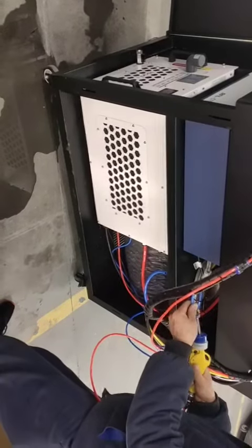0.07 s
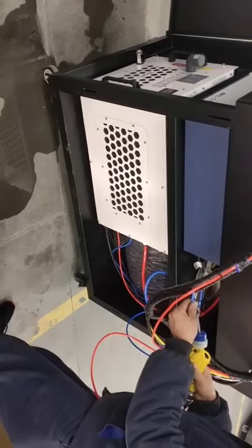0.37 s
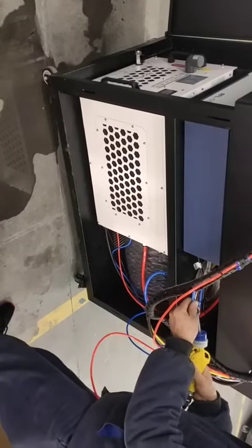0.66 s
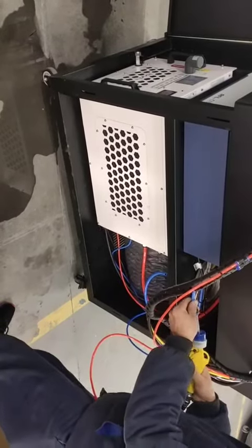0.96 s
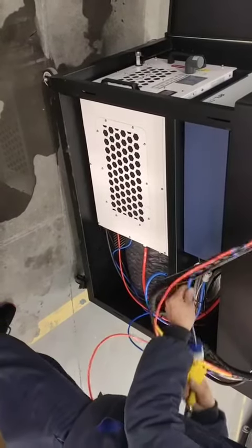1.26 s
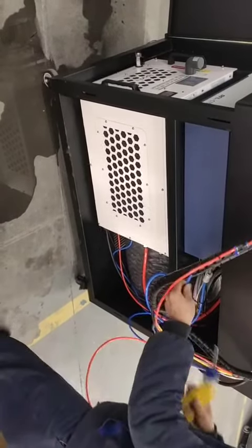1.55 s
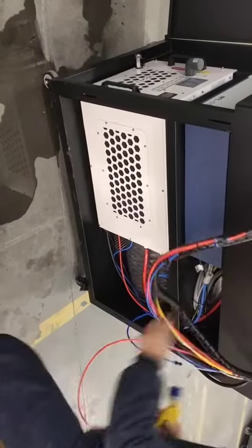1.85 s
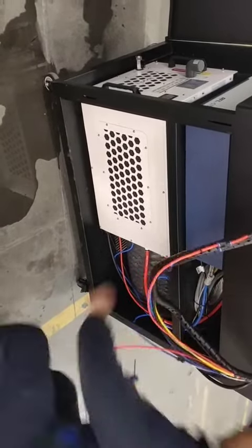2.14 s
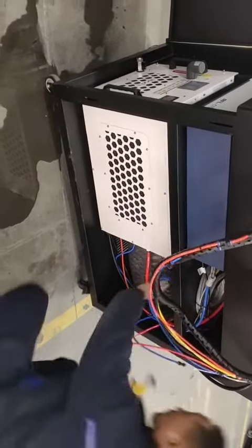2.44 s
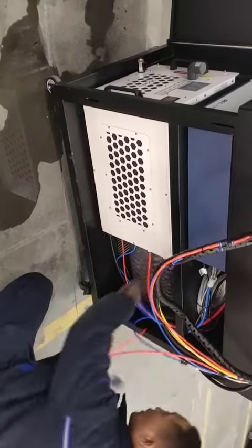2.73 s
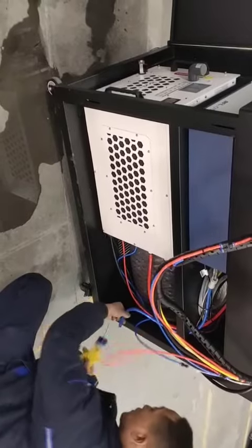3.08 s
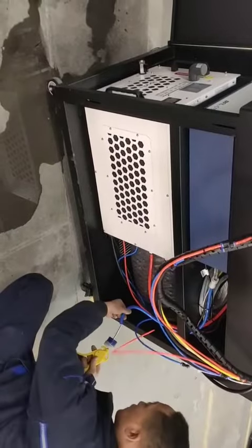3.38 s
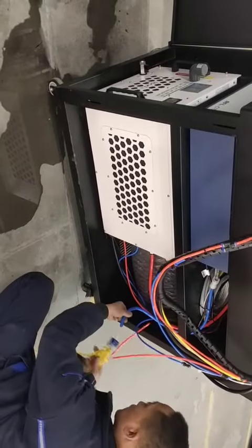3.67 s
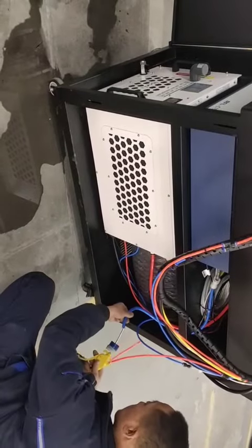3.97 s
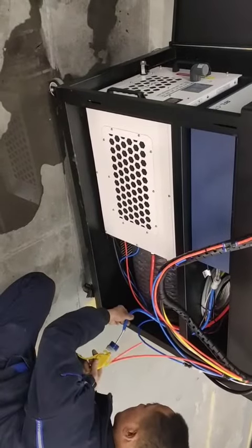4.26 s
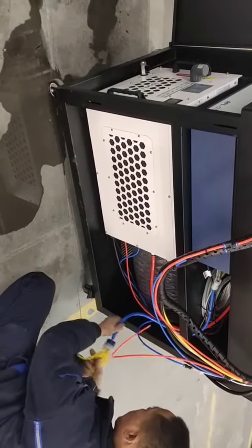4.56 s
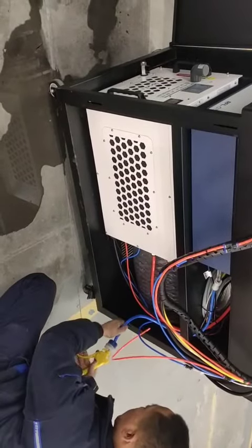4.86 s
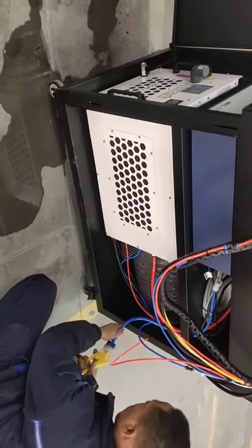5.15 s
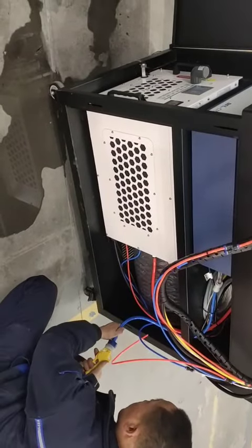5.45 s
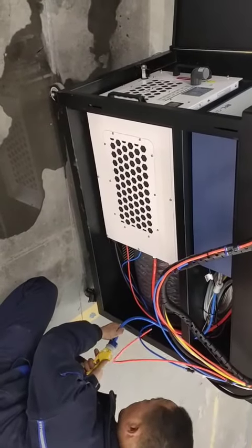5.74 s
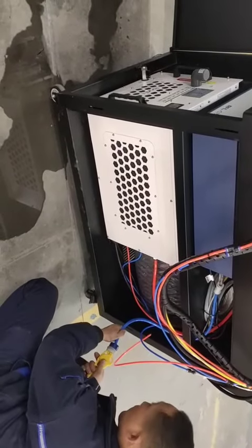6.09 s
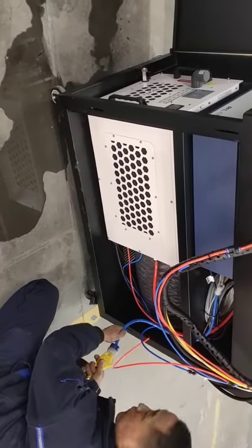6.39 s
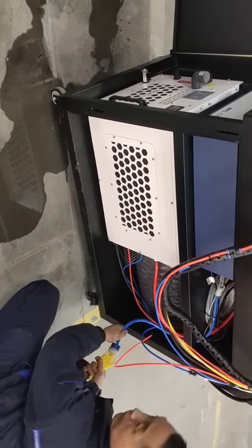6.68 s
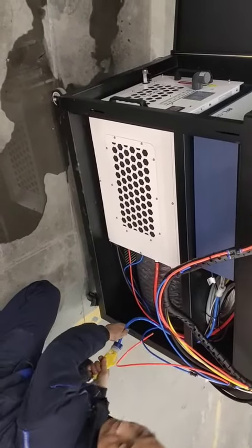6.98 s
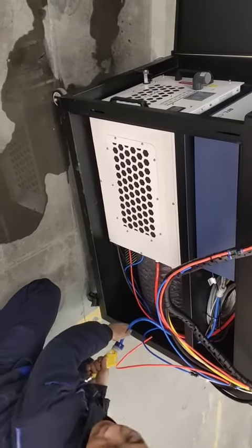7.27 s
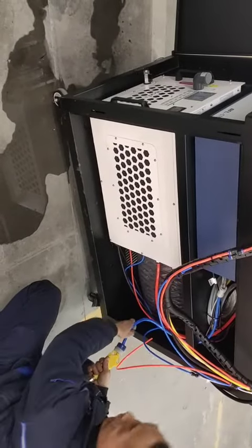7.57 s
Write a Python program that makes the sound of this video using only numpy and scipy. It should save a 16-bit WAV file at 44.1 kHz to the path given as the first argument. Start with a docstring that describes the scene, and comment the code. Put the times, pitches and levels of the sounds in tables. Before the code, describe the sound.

Heard from close above in a workshop, a pump gives a piercing, uneven squeal and a many-toned whine over a loud rushing hiss and a steady compressor hum. Air spurts briefly from a fitting, and hoses are handled with faint bumps. Midway the pump's pitch rises a little and the squeal breaks off, then comes back and weakens, leaving mostly hiss and hum.

```python
"""In a workshop, an open cooling cabinet runs while a worker handles its hoses; a phone listens from above.
The compressor hums with its turning shaft, the worker makes a few soft bumps and air spurts from a fitting.
Liquid and air hiss loudly through a pump: its bearing sings, its rubbing rotor whines and its seal squeals
once a turn. Near four seconds the pump sheds its load and speeds up; the squeal stops, returns and fades."""
import sys
import numpy as np
from scipy import signal
from scipy.fft import rfft, irfft, next_fast_len
from scipy.io import wavfile
from scipy.ndimage import uniform_filter1d, map_coordinates

SR = 44100
rng = np.random.default_rng(int(sys.argv[2]) if len(sys.argv) > 2 else 0)


def dump(signal):
    """Clip the signal to [-1, 1] and save it as 16-bit WAV at the path in sys.argv[1]."""
    limited = np.clip(np.atleast_2d(signal).T, -1, 1)
    pcm = np.round(limited * 32767).astype(np.int16)
    wavfile.write(sys.argv[1], SR, pcm)


N = 340452

# how loud the compressor's steady hum comes through at the phone (time [s], level [dB])
HUM_PICKUP = [(0, -48), (.4, -44.5), (1.25, -44.5), (1.275, -57), (1.4, -45), (1.6, -44), (1.9, -40.5),
              (7.7, -40.5)]
# the tones in that hum (multiple of the shaft speed, relative level [dB])
HUM_TONES = [(1, -29), (2, -0.5), (3, -16), (4, -1), (5, -11.5), (6, -11), (7, -6), (8, -7.5), (9, -17.5),
             (10, -13.5), (11, -15.5), (12, -11.5), (13, -12.5), (14, -12), (15, -18), (16, -14), (17, -16),
             (18, -12.5), (19, -10.5), (20, -13), (21, -6), (22, -13), (23, -11.5)]
# low air noise of the cabinet (frequency [Hz], relative level [dB])
RUMBLE_SPECTRUM = [(20, -13.5), (55, -17.5), (90, -1), (150, -2), (250, -0.5), (400, 3.5), (700, 1.5),
                   (1500, -21.5)]
# the worker's soft bumps (time [s], level [dB], pitch [Hz], half length [s])
WORKER_BUMPS = [(0.058, -40, 172, .06), (0.148, -46, 282, 0.093), (2.143, -38, 264, 0.041),
                (2.277, -39.5, 245, 0.042), (2.37, -43, 280, 0.055), (3.145, -48, 270, 0.11)]
# a fine jet of air, which spurts as the tool leaves the fitting (time [s], level [dB])
JET_LEVELS = [(0, -33.5), (1.2, -32), (1.3, -26.5), (1.38, -37), (1.48, -60.5), (7.7, -69)]
# the noise of that jet, and the narrow note of a hose (frequency [Hz], relative level [dB])
JET_SPECTRUM = [(3900, -20), (4150, 1), (4400, -0.5), (4700, -5), (5000, 0.5), (5700, -5), (6100, -21.5)]
HOSE_NOTE_SPECTRUM = [(2880, -24.5), (2980, -5.5), (3030, 1), (3100, -6), (3200, -26)]

# low, middle and high parts of the flow (frequency [Hz], relative level [dB])
GURGLE_SPECTRUM = [(300, -27), (450, -17.5), (750, -10), (1050, -0.5), (1400, 1), (1800, 0.5), (2300, 1.5),
                   (3000, -17.5)]
HISS_SPECTRUM = [(1300, -34), (1800, -8.5), (2150, -0.5), (2400, -3.5), (2650, -4.5), (3000, -2),
                 (3400, -3), (3800, -1), (4400, -3), (5300, -3.5), (5700, -8.5), (6300, -32)]
SPRAY_SPECTRUM = [(4800, -24), (5800, -2), (6300, -1.5), (6900, -3.5), (7500, -3), (7800, -8),
                  (8100, -15.5), (8500, -33)]
# how loud the gurgle is (time [s], relative level [dB])
GURGLE_LEVELS = [(0.04, -41), (0.51, -41.5), (1.35, -41.5), (1.8, -38.5), (7.4, -38), (7.66, -37)]
# how loud the rest of the flow is (time [s], relative hiss level [dB], relative spray level [dB])
FLOW_LEVELS = [(0.04, -29, -33), (0.14, -31.5, -32), (0.31, -29, -32), (1.31, -31, -33.5),
               (1.38, -28.5, -36.5), (1.76, -29.5, -34), (1.82, -26.5, -34.5), (1.88, -28, -35),
               (3.75, -27.5, -33.5), (3.88, -28, -40), (4.3, -29.5, -41), (4.94, -26.5, -31),
               (5.32, -25.5, -34), (5.39, -27, -33), (6.68, -27, -37), (7.11, -26.5, -36),
               (7.43, -27, -39.5), (7.66, -28, -38.5)]
# a brief dip in the hiss (start [s], end [s], depth [dB])
HISS_DIP = (1.2, 1.32, 2.7)
# pitches at which the hoses ring (frequency [Hz], half width [Hz], boost [dB])
HOSE_RESONANCES = [(3060, 85, 6), (3620, 60, 2.5), (6480, 120, 2.5), (7550, 110, 2.5)]

# the pump sags and labours under load (time [s], speed [turns/s])
LOADED_SPEED = [(0, 155.2), (.5, 153.9), (1.15, 152.5), (1.85, 149.75), (2.7, 150), (3.25, 149.45),
                (3.8, 150.3)]
# the bearing's tone, then its octave (level under load [dB], boost once unloaded [dB], growth [dB/s])
BEARING_TONES = [(-51, 7.5, 0.76), (-52.5, 4.5, 0.66)]
# the bearing sings out (start [s], end [s], tone change [dB], octave change [dB])
BEARING_SURGES = [(1.4, 1.72, 8.5, 2), (1.72, 2.35, -1, 9.5), (2.6, 3.6, -3, 6.5), (3.78, 3.97, 6, 4)]
# the tones of the rubbing rotor (multiple of the pump speed, relative level [dB])
WHINE_TONES = [(10, -50), (11, -45.5), (18, -44), (19, -44), (21, -37), (22, -43.5), (24, -39), (25, -38),
               (26, -45.5), (27, -39.5), (28, -43.5), (31, -44.5), (32, -39.5), (33, -42), (36, -47.5),
               (37, -44.5), (40, -43.5)]
# the rotor's loudest whistles (start [s], end [s], multiple of the pump speed, relative level [dB])
LOUD_WHISTLES = [(0.0, 0.85, 9, -45), (0.02, 0.8, 38, -43), (1.6, 3.0, 10, -41.5), (1.7, 2.45, 51, -44.5),
                 (1.85, 2.5, 39, -42), (2.15, 2.35, 32, -36), (2.4, 3.45, 45, -45), (2.58, 2.95, 51, -42),
                 (2.94, 3.32, 32, -33), (2.95, 3.45, 24, -36.5), (3.0, 3.3, 27, -36.5),
                 (3.05, 3.33, 39, -36), (3.5, 3.75, 10, -41), (3.6, 3.73, 21, -33), (5.1, 5.17, 24, -30),
                 (5.2, 5.9, 39, -45)]
# its faint whistles (lowest multiple of the pump speed, highest multiple)
STRAY_RANGE = (41, 50)
# the rasp around the squeal (frequency [Hz], relative level [dB])
RASP_SPECTRUM = [(1700, -30.5), (2000, -3), (2130, 1), (2260, 5), (2420, -8.5), (2700, -28.5)]
# what the pump's housing lets through of the squeal (frequency [Hz], relative level [dB])
HOUSING_RESPONSE = [(1750, -21), (1860, -5.5), (1950, -16), (1985, -1), (2300, -1.5), (2400, -4.5),
                    (2460, 3), (2550, -1.5), (2680, -23)]
# the seal's squeals
# (start [s], end [s], level [dB], fade [dB/s], resonance [Hz], half width [Hz], phase slip [rad])
SEAL_SQUEALS = [(0.02, 0.43, -28, 8, 2060, 220, .3), (0.447, 0.664, -31, 7, 2190, 230, .35),
                (0.67, 0.823, -25.5, 7, 2130, 190, .25), (0.815, 1.253, -29.5, 12, 2260, 170, 0.23),
                (1.464, 1.74, -22, 7, 2220, 115, 0.28), (1.755, 1.817, -19.5, 6, 2160, 115, 0.18),
                (1.87, 2.686, -22, 6.5, 2172, 115, .2), (2.673, 2.97, -23.5, -5, 2164, 115, .15),
                (2.973, 3.484, -19, 3.5, 2240, 95, .07), (3.495, 3.886, -25.5, 6, 2136, 115, 0.33),
                (3.716, 3.762, -17, 8, 2170, 110, .1), (4.91, 5.14, -22, 16, 2165, 130, 1.1),
                (5.17, 5.78, -29, 8, 2160, 130, 0.54), (5.95, 7.3, -36, 1.5, 2170, 160, 1.1)]

UNLOAD_S = 3.84  # when the pump sheds its load


def amp(db):
    """Turn decibels into a gain to multiply by."""
    return 10 ** (np.asarray(db) / 20)


def unit(x):
    """Scale x to an average (rms) level of 1."""
    return x / np.sqrt(np.mean(x ** 2) + 1e-20)


def curves(rows):
    """Join a table's points with straight lines: one curve for each column after the time."""
    times, *columns = np.transpose(rows)
    return [np.interp(np.arange(N) / SR, times, column) for column in columns]


def gate(start, end, attack, release):
    """Rise, hold and fall; the ramps are centred on start and end, all in seconds."""
    t = np.arange(N) / SR
    return np.clip(.5 + np.minimum((t - start) / attack, (end - t) / release), 0, 1)


def since(start):
    """Seconds gone by since start, 0 before it."""
    return np.maximum(np.arange(N) / SR - start, 0)


def wobble(rate):
    """A smooth curve through `rate` random values a second."""
    coarse = np.arange(0, N + 64, 64)
    knots = rng.standard_normal(int(N * rate / SR) + 4)
    return np.interp(np.arange(N), coarse, map_coordinates(knots, [coarse * rate / SR], mode="nearest"))


def tone(phase):
    """A sine wave of rms level 1 that starts anywhere in its cycle."""
    return np.sqrt(2) * np.sin(phase + rng.uniform(0, 2 * np.pi))


def filtered(x, response):
    """Scale each frequency in x by response(frequency)."""
    size = next_fast_len(N + 8192)
    return irfft(rfft(x, size) * response(np.fft.rfftfreq(size, 1 / SR)), size)[:N]


def rush(spectrum, patchy_db):
    """Rushing noise of rms level 1, shaped by a spectrum, with random louder and softer patches."""
    cells = signal.stft(rng.standard_normal(N), nperseg=512)[2]
    patches = uniform_filter1d(rng.standard_normal(cells.shape), size=5, axis=0)  # smooth over pitch
    patches = uniform_filter1d(patches, size=12, axis=1)  # and over time
    noise = signal.istft(cells * amp(patchy_db * unit(patches)), nperseg=512)[1][:N]
    hz, db = np.transpose(spectrum)
    colour = lambda f: amp(np.interp(np.log(f + 1), np.log(hz), db, left=-120, right=-120))
    return unit(filtered(noise, colour))


def compressor(shaft_hz=46.37, rumble_db=-8, waver_db=.6, drift_rad=.037):
    """The shaft hums steadily at multiples of its speed, over low air noise."""
    pickup_db, = curves(HUM_PICKUP)  # the phone's pickup ducks briefly, then comes back louder
    angle = 2 * np.pi * shaft_hz * np.arange(N) / SR + drift_rad * wobble(2.04)
    hum = sum(amp(level + waver_db * wobble(6.9)) * tone(k * angle) for k, level in HUM_TONES)
    air = rush(RUMBLE_SPECTRUM, patchy_db=.8)
    return amp(pickup_db) * (hum + amp(rumble_db) * air)


def worker_bumps(spread=.2):
    """Each bump is a short swell of dull noise."""
    t, out = np.arange(N) / SR, np.zeros(N)
    for when, db, hz, half_length in WORKER_BUMPS:
        band = lambda f: 1 / (1 + (np.log((f + 1) / hz) / spread) ** 2)
        thud = unit(filtered(rng.standard_normal(N), band))
        out += amp(db) * thud * np.exp(-((t - when) / half_length) ** 2)
    return out


def air_jet():
    """Air escapes at the fitting until the hand lets go of it."""
    db, = curves(JET_LEVELS)
    return amp(db) * rush(JET_SPECTRUM, patchy_db=2)


def hose_note(full_db=-37, build_s=4.2):
    """Once the pump runs free, the flow slowly builds up a breathy note in one hose."""
    build = 1 - np.exp(-since(UNLOAD_S) / build_s)
    return build * amp(full_db + wobble(7)) * rush(HOSE_NOTE_SPECTRUM, patchy_db=3)


def flow(angle, gurgle_gain_db=5, hiss_gain_db=2, spray_gain_db=-1, throb=.049):
    """Liquid and air rush through the pump and ring in the hoses, throbbing a little with each turn."""
    gurgle_db, = curves(GURGLE_LEVELS)
    hiss_db, spray_db = curves(FLOW_LEVELS)
    start, end, dip_db = HISS_DIP
    hiss_db -= dip_db * gate(start, end, .02, .08)
    gurgle = amp(gurgle_db + gurgle_gain_db) * rush(GURGLE_SPECTRUM, patchy_db=1)
    hiss = amp(hiss_db + hiss_gain_db + .14 * wobble(23)) * rush(HISS_SPECTRUM, patchy_db=.6)
    spray = amp(spray_db + spray_gain_db) * rush(SPRAY_SPECTRUM, patchy_db=1.7)
    hoses = lambda f: amp(sum(db / (1 + ((f - hz) / width) ** 2) for hz, width, db in HOSE_RESONANCES))
    return filtered(gurgle + hiss + spray, hoses) * (1 + throb * np.cos(angle))


def unloaded(settle_s=.26):
    """How much of its load the pump has shed, from 0 to 1."""
    return 1 - np.exp(-since(UNLOAD_S) / settle_s)


def pump_speed(jump_hz=11.2, creep_hz_per_s=.89):
    """Turns per second: slow under load, quickly faster once it is shed, then creeping up."""
    loaded, = curves(LOADED_SPEED)
    return loaded + jump_hz * unloaded() + creep_hz_per_s * since(UNLOAD_S)


def bearing(angle, passes_per_turn=3.56, flutter_db=2.5, slip_rad=.59):
    """Balls roll past one spot on their track, making a tone and its octave, which is rough under load."""
    tone_db, octave_db = [loaded + boost * unloaded() + growth * since(UNLOAD_S)
                          for loaded, boost, growth in BEARING_TONES]
    for start, end, tone_change, octave_change in BEARING_SURGES:
        swell = gate(start, end, .1, .17)
        tone_db += tone_change * swell
        octave_db += octave_change * swell
    phase = passes_per_turn * angle
    octave = tone(2 * phase + slip_rad * (1 - unloaded()) * wobble(70))
    return amp(tone_db + wobble(9.2)) * tone(phase) + amp(octave_db + flutter_db * wobble(7.3)) * octave


def rubbing_db(base_db=-2, db_per_spray_db=1.2, relief_db=12, loose_db=8):
    """The rotor rubs harder with more spray and when dragged to its slowest, and less once unloaded."""
    _, spray_db = curves(FLOW_LEVELS)
    loaded, = curves(LOADED_SPEED)
    looseness = (loaded - loaded.min()) / np.ptp(loaded)
    extra_db = db_per_spray_db * (spray_db - spray_db.mean())
    return base_db + extra_db - relief_db * unloaded() - loose_db * looseness


def stray_whistles(angle, gain_db=-43):
    """Faint high whistles come and go at random while the rotor rubs."""
    lowest, highest = STRAY_RANGE
    whistles = np.zeros(N)
    for k in range(lowest, highest + 1):
        presence = np.clip(.4 + wobble(3), 0, 1)
        whistles += presence * tone(k * angle + .1 * wobble(9.8))
    return amp(rubbing_db() + gain_db) * whistles


def rotor_whine(angle, waver_db=3.5, whistle_gain_db=1):
    """The rubbing rotor makes many high, wavering tones; now and then one locks in and whistles."""
    rub = amp(rubbing_db())
    gains = {k: rub * amp(db + waver_db * wobble(6)) for k, db in WHINE_TONES}
    for start, end, k, db in LOUD_WHISTLES:
        whistle = gate(start, end, .05, .05) * amp(db + whistle_gain_db + 1.8 * wobble(8))
        gains[k] = np.maximum(gains.get(k, 0), whistle)
    return sum(gain * tone(k * angle + .1 * wobble(14)) for k, gain in gains.items())


def rasp(angle, gain_db=-34, throb=.86):
    """No two turns rub alike: each gives a puff of noise near the squeal's pitch."""
    noise = rush(RASP_SPECTRUM, patchy_db=1)
    return amp(rubbing_db() + gain_db) * noise * (1 + throb * np.cos(angle))


def seal_grip(attack_s=.06, release_s=.05, lag_s_per_rad=.12, climb_hz_per_s=63):
    """The seal's strength, resonance, width and slip over time; in an overlap the louder squeal leads."""
    power, weight, blend = np.zeros(N), np.zeros(N), np.zeros((3, N))
    for start, end, db, fade, hz, width, slip in SEAL_SQUEALS:
        age = np.minimum(since(start), end - start)
        lag = lag_s_per_rad * slip  # a loose grip swells and lets go more slowly
        envelope = gate(start, end, attack_s + lag, release_s + lag) * amp(db - fade * age)
        power += envelope ** 2
        share = envelope ** 2 + 1e-12
        weight += share
        blend += [share * (hz + climb_hz_per_s * age), share * width, share * slip]
    return np.sqrt(power), *(blend / weight)


def seal_squeal(speed, angle, waver_db=2):
    """Once a turn the seal sets a resonance ringing: the multiples of the speed nearest it stand out."""
    strength, centre, width, slip = seal_grip()
    ring, power = np.zeros(N), np.zeros(N)
    for k in range(12, 18):
        detune = (k * speed - centre) / width
        housing_db = np.interp(k * speed, *np.transpose(HOUSING_RESPONSE))
        gain = amp(housing_db + waver_db * wobble(8.3)) / (1 + detune ** 2)
        # a loose grip lets the phase wander, which blurs the tones into a rasp
        ring += gain * tone(k * angle + slip * wobble(45))
        power += gain ** 2
    flutter = amp(wobble(15))
    return ring / np.sqrt(power) * strength * flutter


def scene():
    """The pump's speed drives all of its sounds; one microphone hears it with everything around it."""
    speed = pump_speed()
    angle = 2 * np.pi * np.cumsum(speed) / SR  # how far the pump has turned, in radians
    pump = seal_squeal(speed, angle) + rasp(angle)
    pump += rotor_whine(angle) + stray_whistles(angle) + bearing(angle)
    mono = pump + flow(angle) + hose_note() + air_jet() + compressor() + worker_bumps()
    return np.array([mono, mono])


def record(dry, top_hz=8500):
    """The phone picks up nothing higher than top_hz."""
    return np.array([filtered(channel, lambda hz: hz < top_hz) for channel in dry])


dry = scene()
out = record(dry)
dump(out)
```